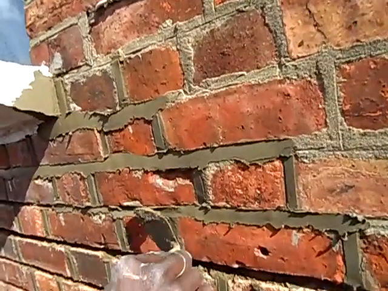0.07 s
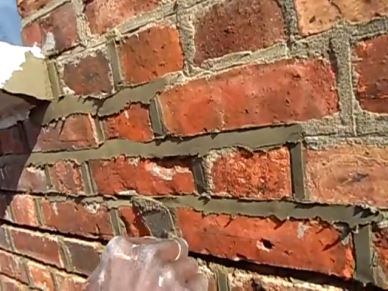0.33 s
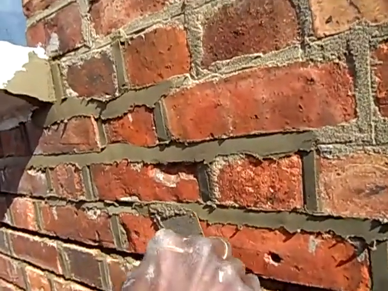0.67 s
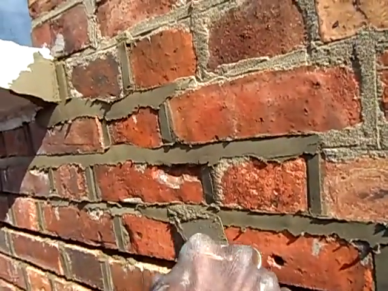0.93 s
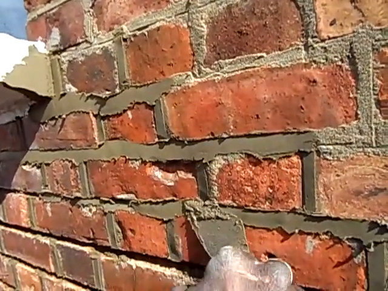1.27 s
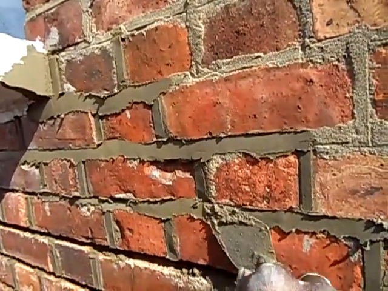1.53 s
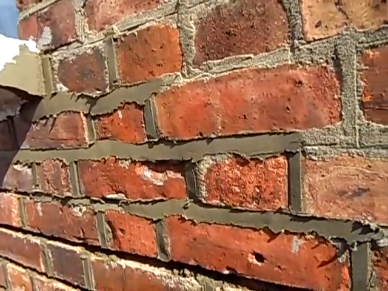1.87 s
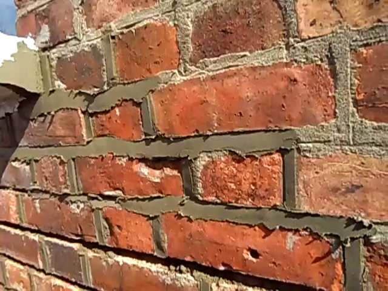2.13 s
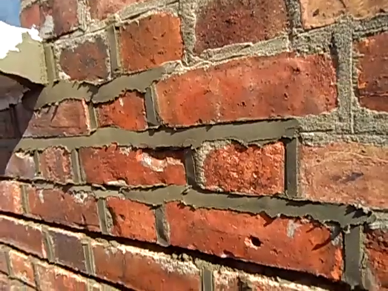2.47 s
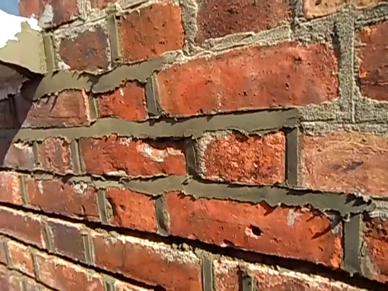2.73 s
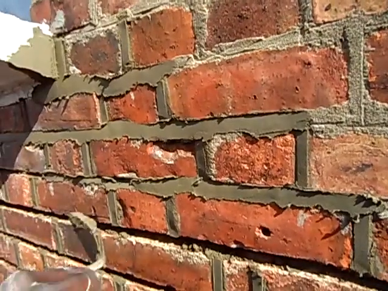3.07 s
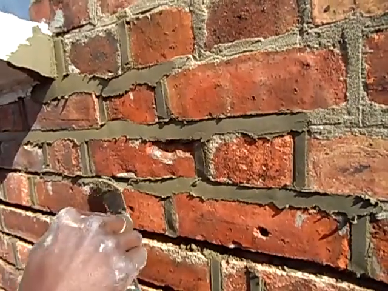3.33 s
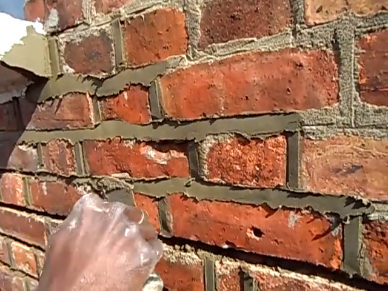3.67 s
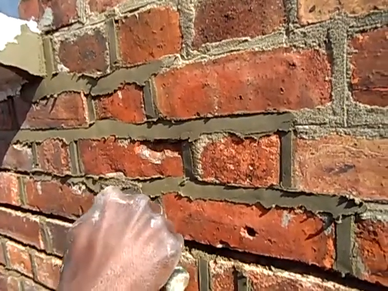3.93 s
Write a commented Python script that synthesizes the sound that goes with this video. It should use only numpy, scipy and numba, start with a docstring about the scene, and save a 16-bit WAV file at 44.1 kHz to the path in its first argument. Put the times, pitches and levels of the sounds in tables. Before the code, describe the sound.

Gritty trowel scraping on wet mortar and brick outdoors, with wind rumbling on the microphone.

```python
"""A steel trowel presses wet mortar into a brick joint. Sand grinds along the blade's edge and rings its
modes, with a louder, ticking flat press midway; the squeezed mortar hisses and pops.
One short, hollow scrape follows, as of fresh mortar being scooped up. The wall adds a brief reflection.
Wind buffets the microphone and a far motor whines throughout, over a faint outdoor hiss."""
import sys
import numpy as np
from scipy import signal
from scipy.fft import rfft, irfft
from scipy.io import wavfile
from numba import njit

SR = 44100
rng = np.random.default_rng(int(sys.argv[2]) if len(sys.argv) > 2 else 0)


def materialize(psi):
    """Save the field psi as 16-bit PCM at rate SR to the path in sys.argv[1].

    A 1-D psi becomes a single channel; in a 2-D psi each row is a channel.
    """
    bounded = np.clip(np.atleast_2d(psi).T, -1, 1)
    quanta = np.round(bounded * 32767).astype(np.int16)
    wavfile.write(sys.argv[1], SR, quanta)


N = 176400
TIME_S = np.arange(N) / SR
FREQ_HZ = np.maximum(np.arange(N + 1) * SR / (2 * N), 1e-3)

# grains cracking under the blade: start_s, level_db
SAND_TICKS = [(1.105, -27), (1.108, -39), (1.175, -20.5), (1.193, -25.5), (1.217, -31), (1.246, -23),
              (1.274, -33), (1.287, -22), (1.2885, -21.5), (1.292, -19), (1.3035, -36), (1.3278, -15),
              (1.354, -34), (1.360, -20.5), (1.418, -25.5), (1.517, -25.5)]
# blade edge catching on brick: start_s, length_s, level_db
EDGE_CATCHES = [(1.497, 0.01, -26), (1.662, 0.023, -49), (1.824, 0.022, -33), (1.870, .015, -46),
                (1.892, 0.0077, -27)]
# trowel touching the wall again: start_s, level_db
WALL_TOUCH = [(3.504, -40.5)]
# sand under the flat blade: time_s, level_db
FLAT_DRAG_LEVEL = [(1.08, -70), (1.16, -45), (1.25, -37), (1.31, -37), (1.38, -43), (1.48, -46),
                   (1.56, -55)]
# sand under the edge: time_s, level_db
EDGE_DRAG_LEVEL = [(.75, -61), (.92, -50.5), (1.1, -55.5), (1.42, -45.5), (1.57, -53), (1.67, -43.5),
                   (1.78, -45), (1.86, -42), (1.915, -43.5), (1.95, -71)]
# blade lying flat: pitch_hz, width_hz, gain_db
FLAT_BLADE_MODES = [(3460, 420, 5.5), (4490, 350, -2.5), (5190, 840, 2.5), (6050, 1000, -9),
                    (7400, 1100, -6.5), (10600, 1140, 0), (12000, 800, -11), (13800, 1900, -13),
                    (14400, 1100, -6)]
# blade on edge: pitch_hz, width_hz, gain_db
EDGE_BLADE_MODES = [(3130, 500, 3), (4410, 650, 2.5), (5680, 600, 4.5), (8330, 1700, -9.5),
                    (10640, 1200, 0), (12100, 870, -13), (13800, 1000, -21)]
# blade's lowest ring while pressed in: time_s, pitch_hz, level_db
PRESS_RING = [(.15, 4060, -75), (.3, 3620, -58.5), (.48, 3500, -63), (.56, 3080, -60), (.68, 3000, -56.5),
              (.82, 2900, -68)]
# wet mortar hiss: time_s, level_db
MORTAR_LEVEL = [(0, -82), (.48, -71), (.62, -55), (.73, -54.5), (.8, -49.5), (.93, -46), (1.0, -51),
                (1.13, -49), (1.25, -46), (1.45, -51), (1.56, -51), (1.75, -55), (1.91, -46), (1.96, -85),
                (2.58, -78), (2.69, -61), (2.9, -84), (3.5, -73), (3.72, -61), (3.83, -49), (3.92, -58.5),
                (4, -57)]
# tiny wet pops: start_s, level_db
MORTAR_POPS = [(.944, -25), (.959, -26.5), (1.407, -25), (1.436, -28)]
# wet mortar spectrum: freq_hz, gain_db
MORTAR_SPECTRUM = [(1500, -20), (4000, -15), (7000, -14), (9000, -8), (11000, -3.5), (13700, 1),
                   (15000, -6), (16500, -10)]
# scooping stroke: time_s, hollow_db, sand_db
SCOOP_LEVELS = [(2.715, -66, -54), (2.745, -40, -32), (2.76, -33, -33.5), (2.79, -26, -31.5),
                (2.802, -26, -30), (2.816, -23, -28), (2.837, -25, -29.5), (2.843, -39, -40),
                (2.865, -67, -64)]
# hollow resonances of the scoop: pitch_hz, width_hz, gain_db
HOLLOW_MODES = [(570, 160, 6.5), (790, 120, 2), (1010, 61, 5), (1410, 280, 10), (1720, 400, -0.5),
                (2140, 220, -8), (2500, 200, -4.5)]
# scooped sand spectrum: freq_hz, gain_db
SAND_SPECTRUM = [(500, -1), (2500, -2), (4200, -2.5), (6800, -3.5), (8700, -4.5), (11000, -4), (13800, 0.5),
                 (15500, -11)]
# eddies at the microphone: centre_s, length_s, level_db, cutoff_hz
WIND_GUSTS = [(-0.02, 0.082, -7.5, 182), (.092, 0.031, -20.5, 267), (.155, 0.023, -21.5, 295),
              (0.395, 0.14, -31.5, 90), (0.645, 0.018, -26, 92), (0.922, 0.037, -23, 175),
              (1.029, 0.1, -19, 164), (1.794, 0.052, -21.5, 133), (1.86, .11, -29.5, 78.6),
              (2.136, 0.064, -27, 108), (2.192, 0.032, -22.5, 190), (2.398, 0.052, -24, 177),
              (2.507, 0.049, -27.5, 121), (2.561, 0.053, -20, 117), (2.657, 0.02, -19.5, 130),
              (2.743, 0.046, -19.5, 109), (2.812, .05, -30, 79), (3.552, .05, -19.5, 121),
              (3.62, 0.059, -20, 193), (3.901, 0.058, -23.5, 138), (3.987, 0.065, -24, 160)]
# breeze under the gusts: time_s, level_db
BREEZE_LEVEL = [(0, -31.5), (.9, -35), (1.15, -38), (1.5, -42), (2.0, -37.5), (2.6, -32), (3.0, -34),
                (3.4, -33.5), (4, -32.5)]
# breeze spectrum: freq_hz, gain_db
BREEZE_SPECTRUM = [(10, 2), (30, -1.5), (80, -3.5), (130, -14), (250, -19.5), (500, -44.5), (1500, -57)]
# motor whine: harmonic, level_db, full_lull_db
MOTOR_PARTIALS = [(1, -43.5, -48.5), (2, -66.5, -60), (3, -63, -59), (12, -66, -62.5)]
# lull in the whine: time_s, depth_fraction
MOTOR_LULL = [(1.95, 0), (2.3, 1), (2.7, 0.96), (2.9, 0.4), (4, 0.22)]
# far low drone: time_s, level_db
DRONE_LEVEL = [(0, -52), (.8, -48), (1.3, -59.5), (2.9, -57.5), (3.3, -48), (4, -47.5)]
# outdoor hiss spectrum: freq_hz, gain_db
AIR_SPECTRUM = [(30, 3), (150, -6.5), (330, -4.5), (600, -2.5), (780, -13.5), (1300, -15), (1700, -15),
                (2200, -17.5), (3600, -16), (4500, -15), (5400, -18), (6400, -22), (7600, -27),
                (12500, -27.5), (15500, -39)]


def trowel(tick_tail_s=0.0013, catch_attack_s=0.0015, knock_db=-14.5):
    """Sand rings the blade along its edge, with a ticking flat press midway; the brick knocks dully."""
    ticks = cracks(SAND_TICKS, tick_tail_s, tail_db=-6)
    flat = ticks + stroke(FLAT_DRAG_LEVEL) * grains(rate_per_s=7000, spread=0.6, patchiness=0.39)
    catches = np.zeros(N)
    for start_s, length_s, level_db in EDGE_CATCHES:
        age_s = TIME_S - start_s
        attack = np.clip(age_s / catch_attack_s, 0, 1)
        catches += undb(level_db) * attack * np.exp(-2 * (age_s / length_s) ** 2)
    edge = (stroke(EDGE_DRAG_LEVEL) + catches) * grains(rate_per_s=10000, spread=0.45, patchiness=0.11)
    flat_ring = blade(flat, FLAT_BLADE_MODES, highpass_hz=2400, middle_s=1.276)
    edge_ring = blade(edge, EDGE_BLADE_MODES, highpass_hz=1700, middle_s=1.83)
    knocks = undb(knock_db) * (ticks + catches * noise()) + cracks(WALL_TOUCH, tick_tail_s, tail_db=0)
    brick = resonances([(1500, 2300, 0)], highpass_hz=600)
    return flat_ring + edge_ring + filtered(knocks, brick)


def blade(drive, modes, highpass_hz, middle_s, sag_per_s=0.14):
    """Steel modes sink along the stroke, passing their listed pitch at middle_s; energy is kept."""
    bend = 1 - np.clip(sag_per_s * (TIME_S - middle_s), -.1, .1)
    drive = drive + 1e-18  # avoids denormals
    rings = sum(undb(db) * ring(drive, hz * bend, width_hz) for hz, width_hz, db in modes)
    rings = signal.sosfilt(signal.butter(2, highpass_hz, "high", fs=SR, output="sos"), rings)
    return rings * np.linalg.norm(drive) / np.linalg.norm(rings)


@njit
def ring(drive, pitch_hz, width_hz):
    """One damped mode of moving pitch: a state-variable band-pass."""
    out = np.empty(len(drive))
    band_state, low_state = 0., 0.
    for i in range(len(drive)):
        tuning = np.tan(np.pi * pitch_hz[i] / SR)
        damping = np.pi * width_hz / SR * (tuning + 1 / tuning)
        band = (band_state + tuning * (drive[i] - low_state)) / (1 + tuning * (tuning + damping))
        band_state = 2 * band - band_state
        low_state += 2 * tuning * band
        out[i] = damping * band
    return out


def pressing():
    """A faint narrow rub sinks in pitch as the blade beds in."""
    phase = 2 * np.pi * np.cumsum(curve(PRESS_RING)) / SR
    return stroke(PRESS_RING, column=2) * np.sqrt(2) * wander(rate_hz=230) * np.sin(phase)


def mortar():
    """Wet mortar fizzes and pops as it is squeezed."""
    fizz = stroke(MORTAR_LEVEL) * grains(rate_per_s=7000, spread=.55, patchiness=0.11)
    pops = cracks(MORTAR_POPS, tail_s=.0007, tail_db=-10)
    return filtered(fizz + pops, colour(MORTAR_SPECTRUM))


def scoop(lowpass_hz=3300):
    """A quick gritty scrape swells in hollow resonances and stops as the blade lifts."""
    response = resonances(HOLLOW_MODES, highpass_hz=373) / np.sqrt(1 + (FREQ_HZ / lowpass_hz) ** 8)
    hollow = filtered(grains(rate_per_s=3600, spread=0.21, patchiness=0.12), response)
    sand = filtered(grains(rate_per_s=3700, spread=0.17, patchiness=0.14), colour(SAND_SPECTRUM))
    return stroke(SCOOP_LEVELS) * hollow + stroke(SCOOP_LEVELS, column=2) * sand


def grains(rate_per_s, spread, patchiness):
    """Dense clicks of log-normal size, louder in patches; rms 1."""
    hits = rng.random(N) < rate_per_s / SR
    size = np.exp(spread * np.clip(noise(), -2, 2) + patchiness * wander(rate_hz=90))
    return unit_rms(hits * size * np.sign(noise()))


def cracks(events, tail_s, tail_db):
    """Each event is a click and a brief crumble; its level is the rms over 1 ms."""
    out = np.zeros(N)
    decay = np.exp(-TIME_S[:1024] / tail_s)
    for start_s, level_db in events:
        crumble = rng.standard_normal(len(decay)) * decay
        burst = undb(tail_db) * crumble / np.linalg.norm(crumble)
        burst[0] = 1  # the click
        burst *= np.sqrt(SR / 1000) / np.linalg.norm(burst)
        start = int(start_s * SR)
        out[start:start + len(burst)] += undb(level_db) * burst
    return out


def wall_reflection(direct, t60_s=0.083, level_db=-14.5):
    """The wall returns a short diffuse tail."""
    tail = noise() * undb(-60 * TIME_S / t60_s)
    return undb(level_db) * filtered(direct, rfft(tail, 2 * N))


def wind(highpass_hz=20.7, flutter_db=2.33):
    """Eddies thump the microphone over an uneven breeze."""
    out = stroke(BREEZE_LEVEL) * filtered(noise(), colour(BREEZE_SPECTRUM))
    out *= undb(flutter_db * wander(rate_hz=14))
    rumble = FREQ_HZ / np.hypot(FREQ_HZ, highpass_hz) / FREQ_HZ ** 0.27
    for centre_s, length_s, level_db, cutoff_hz in WIND_GUSTS:
        swell = np.exp(-abs(2 * (TIME_S - centre_s) / length_s) ** 3)
        eddy = swell * filtered(noise(), rumble / np.sqrt(1 + (FREQ_HZ / cutoff_hz) ** 6.68))
        out += undb(level_db) * eddy * np.linalg.norm(swell) / np.linalg.norm(eddy)
    return out


def motor(whine_hz=532.7, drone_hz=222.4):
    """A far motor's whine wavers on the way, its overtones most, over a low drone."""
    cycles = np.cumsum(whine_hz * (1 + 0.00071 * wander(rate_hz=11.6))) / SR
    lull = curve(MOTOR_LULL)
    whine = np.zeros(N)
    for harmonic, level_db, full_lull_db in MOTOR_PARTIALS:
        mean_db = level_db + (full_lull_db - level_db) * lull
        waver_db = (0.4 + np.log(harmonic) / 2) * wander(rate_hz=8.5)
        whine += undb(mean_db + waver_db) * np.sin(2 * np.pi * harmonic * cycles)
    drone = stroke(DRONE_LEVEL) * np.sin(2 * np.pi * drone_hz * TIME_S + wander(rate_hz=2.1))
    return np.sqrt(2) * (whine + drone)


def outdoor_hiss(level_db=-47, waver_db=0.47):
    """Faint, nearly steady hiss."""
    return undb(level_db + waver_db * wander(rate_hz=4.1)) * filtered(noise(), colour(AIR_SPECTRUM))


def undb(db):
    """Decibels to gain."""
    return 10 ** (np.asarray(db) / 20)


def unit_rms(x):
    """Scale to rms 1."""
    return x / np.sqrt(np.mean(x ** 2))


def curve(rows, column=1):
    """One table column, linear in time."""
    rows = np.array(rows)
    return np.interp(TIME_S, rows[:, 0], rows[:, column])


def stroke(rows, column=1):
    """Gain of a dB curve, silent outside its span."""
    return undb(curve(rows, column)) * (TIME_S >= rows[0][0]) * (TIME_S <= rows[-1][0])


def noise():
    """White noise."""
    return rng.standard_normal(N)


def wander(rate_hz):
    """Random drift below rate_hz; rms 1."""
    return unit_rms(filtered(noise(), 1 / (1 + (FREQ_HZ / rate_hz) ** 4)))


def filtered(x, response):
    """Filter by a response scaled to unit power gain."""
    return irfft(rfft(x, 2 * N) * response / np.sqrt(np.mean(abs(response) ** 2)))[:N]


def colour(spectrum):
    """Response through freq_hz, gain_db points."""
    freq_hz, gain_db = np.array(spectrum).T
    return undb(np.interp(np.log(FREQ_HZ), np.log(freq_hz), gain_db))


def resonances(modes, highpass_hz):
    """Response of damped modes that radiate little below highpass_hz."""
    s = 1j * FREQ_HZ
    peaks = sum(undb(db) * s * width_hz / (s * s + s * width_hz + hz * hz) for hz, width_hz, db in modes)
    return peaks * s * s / (s * s + np.sqrt(2) * s * highpass_hz + highpass_hz ** 2)


def scene():
    """Trowel work and its reflection, with wind, motor and hiss; mono."""
    work = trowel() + pressing() + mortar() + scoop()
    return (work + wall_reflection(work) + outdoor_hiss() + wind() + motor())[None]


def record(dry):
    """Steep low-pass on the top treble."""
    cutoff_hz = 15750
    return signal.sosfilt(signal.ellip(10, .2, 80, cutoff_hz, fs=SR, output="sos"), dry)


dry = scene()
out = record(dry)
materialize(out)
```